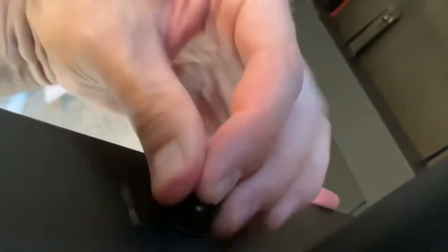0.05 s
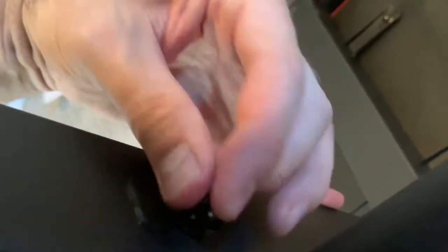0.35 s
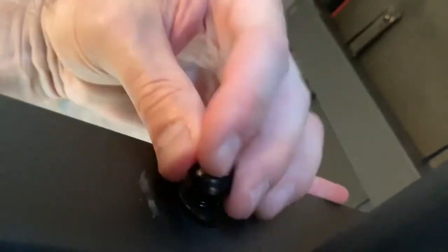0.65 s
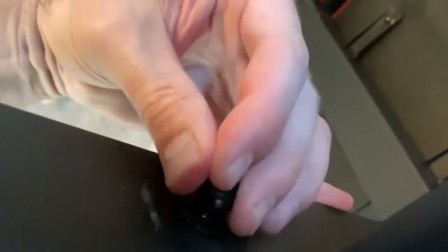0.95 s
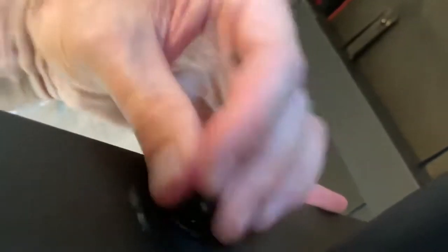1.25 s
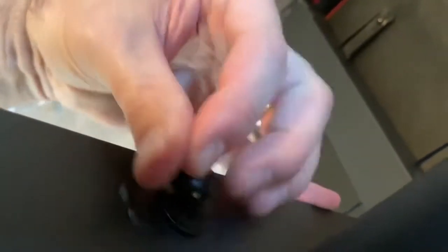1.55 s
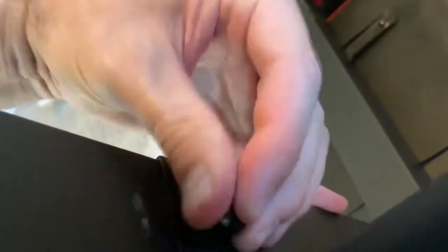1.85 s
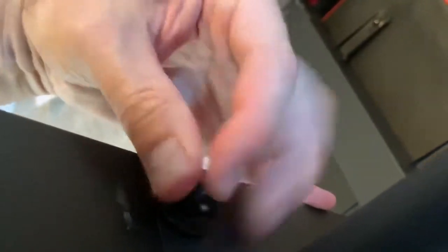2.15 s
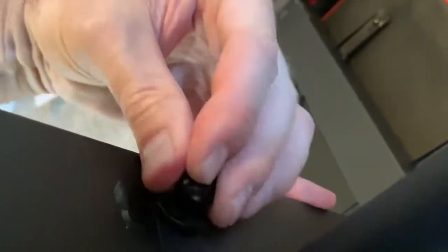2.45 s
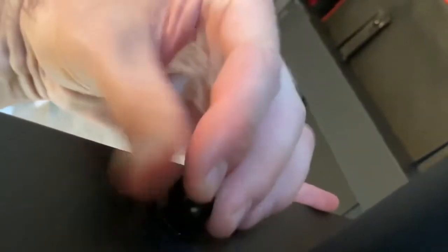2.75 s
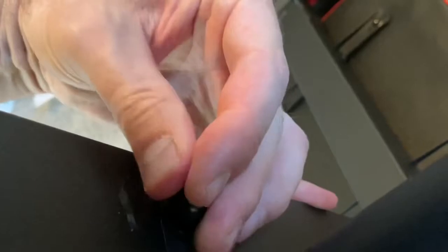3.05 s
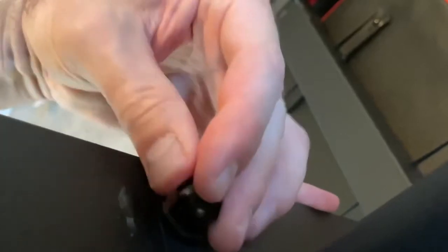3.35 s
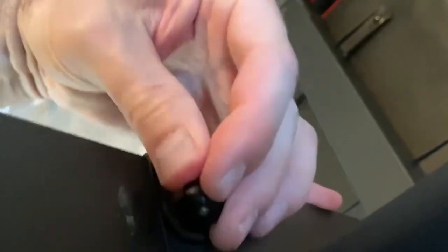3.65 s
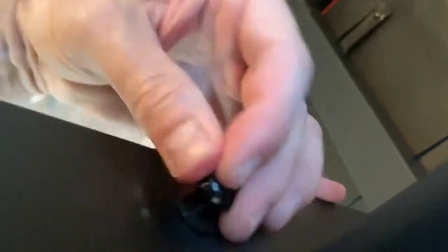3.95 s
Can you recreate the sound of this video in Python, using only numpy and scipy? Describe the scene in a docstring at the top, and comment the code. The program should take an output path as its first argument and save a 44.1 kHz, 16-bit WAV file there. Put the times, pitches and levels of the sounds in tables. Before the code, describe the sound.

A small knob clicks and snaps as fingers turn it, over a low hum.

```python
"""Over mains hum and low machine rumble in a quiet room, fingers turn a small knob on a metal frame,
heard close and wide. Clicks begin at 0.2 s, each a crunch of tiny impacts that rings the frame;
between them the loose knob scuffs and knocks. The catch snaps hard at 1.1 s, skin slides to a new grip
at 1.6 s, and a second hard snap at 1.8 s comes with a clack of the knob's body. Weaker clicks and two
more slides follow, and two faint knocks close the scene near 3.9 s."""
import sys
import numpy as np
from scipy import signal
from scipy.fft import rfft, irfft
from scipy.io import wavfile

SR = 44100
rng = np.random.default_rng(int(sys.argv[2]) if len(sys.argv) > 2 else 0)


def store_pcm(level_fs):
    """Save levels as 16-bit WAV."""
    pcm = np.round(np.clip(level_fs, -1, 1) * 32767).astype(np.int16)
    wavfile.write(sys.argv[1], SR, np.atleast_2d(pcm).T)


N = 176400
HZ, TIME = np.fft.rfftfreq(N, 1 / SR), np.arange(N) / SR

# Event levels are relative within each table.
# knob clicks: (peak time [s], low level [dB], middle level [dB], high level [dB], rise [s], fall [s])
CLICKS = [(.212, -39.5, -52, -57, 0.008, 0.014), (.228, -40.5, -40.5, -38.5, 0.00045, 0.0075),
          (.250, -45, -46, -54, 0.0052, 0.027), (.265, -44, -40.5, -41, 0.0017, .0085),
          (0.325, -44, -53, -55, 0.00072, 0.011), (1.085, -31, -29, -26.5, 0.0027, 0.0078),
          (1.253, -42, -33.5, -34, 0.0024, 0.0085), (1.762, -43, -57, -65, 0.0016, 0.007),
          (1.776, -38, -47, -60, .0027, 0.005), (1.791, -28.5, -25.5, -35, .0037, 0.0069),
          (1.797, -36, -27, -33, 0.0011, .004), (1.879, -36.5, -32, -35, 0.0016, 0.0045),
          (2.105, -48, -43.5, -48, 0.00053, 0.0063), (2.13, -28, -40, -44, 0.0031, 0.0045),
          (2.145, -41.5, -40.5, -53, 0.002, 0.01), (2.578, -34.5, -43, -36.5, 0.0028, 0.0047),
          (2.592, -37.5, -43.5, -43, 0.011, 0.015), (2.868, -41, -42.5, -49, .0008, 0.0022),
          (3.209, -31, -39, -42.5, 0.0043, 0.008), (3.442, -42, -50, -57, 0.004, 0.0036)]
# low, middle, high and top bands of a click: (frequency [Hz])
CLICK_BANDS_HZ = [1660, 5700, 9800, 15800]
# spectrum common to all clicks: (frequency [Hz], gain [dB])
CLICK_SPECTRUM = [(100, -43), (380, -11), (520, -5.5), (780, -7), (1100, 0), (1550, 3.5), (2300, 5),
                  (3400, 1), (5000, -3.5), (7000, 1.5), (8700, 4.5), (11000, -4.5), (13500, -9)]
# snaps of the catch: (time [s], level [dB], fall [s])
SNAPS = [(.2272, -25, .0012), (.640, -41.5, 0.0026), (.667, -39, 0.002), (1.0798, -14.5, 0.0056),
         (1.2518, -23, 0.00094), (1.424, -44, 0.0059), (1.7922, -30, 0.00084), (1.7963, -8, 0.00076),
         (1.815, -29, 0.0006), (1.878, -22, .0018)]
# spectrum of a snap: (frequency [Hz], gain [dB])
SNAP_SPECTRUM = [(400, -23), (2500, -7.5), (5200, -12), (7000, -3), (9800, -1.5), (12500, -19)]
# modes of the metal frame: (frequency [Hz], gain [dB], T60 before the cap [s])
FRAME_MODES = [(602, -6.5, 0.14), (2776, 7, 0.064), (2965, 10.5, 0.096), (3560, 8, 0.15), (3890, 9, 0.04),
               (4450, 10.5, 0.077), (5330, 8, 0.13), (5970, 7, 0.14), (6460, 5, 0.054), (6940, 7.5, 0.03),
               (7850, 7, 0.17), (10300, -6, 0.044), (11020, -1.5, 0.09)]
# clacks of the knob's body: (time [s], level [dB])
CLACKS = [(1.788, -27), (1.878, -45), (2.127, -33), (2.579, -36), (3.206, -53), (3.44, -41.5)]
# modes of the knob's body: (frequency [Hz], gain [dB], T60 [s])
KNOB_MODES = [(1990, 1.5, 0.068), (2457, 2.5, 0.058), (2773, 1, 0.027)]
# knocks of the loose knob: (peak time [s], level [dB], treble tilt [dB/octave])
KNOCKS = [(.081, -57, 2), (.394, -41, -2.5), (.485, -55.5, -3.5), (.863, -55.5, -2), (.907, -52.5, -4),
          (2.165, -49.5, 0.5), (2.223, -49.5, -1.5), (2.372, -56.5, 0), (3.355, -55, -8),
          (3.915, -52.5, -4.5), (3.943, -55, -5.5)]
# dull scuffs of the turning knob: (peak time [s], level [dB], treble tilt [dB/octave])
SCUFFS = [(.031, -48, -11.5), (.153, -54, -14.5), (.614, -52, -10.5), (1.062, -50, -6.5),
          (1.228, -50.5, -6), (2.712, -60, -7), (2.77, -57.5, -11.5), (3.19, -54, -7), (3.86, -64.5, -2)]
# spectrum of the knob touching its seat: (frequency [Hz], gain [dB])
SEAT_SPECTRUM = [(200, -15), (700, -5.5), (1400, 7.5), (2400, 9.5), (4200, 6.5), (8000, 4.5), (15000, -11)]
# skin sliding to a new grip: (peak time [s], level [dB], rise [s], fall [s])
SLIDES = [(1.582, -58, 0.026, 0.087), (2.65, -64, 0.062, 0.087), (3.55, -57, 0.028, 0.082)]
# spectrum of skin friction: (frequency [Hz], gain [dB])
SKIN_SPECTRUM = [(300, -46), (1200, -1.5), (2500, 6.5), (7000, -2), (11000, -8), (14500, -23)]
# soft ticks of the fingers: (time [s], level [dB], frequency [Hz])
TICKS = [(.176, -47.5, 784), (0.611, -46.5, 710), (.618, -45.5, 2000), (2.996, -54.5, 1400),
         (3.018, -51, 1370)]
# stereo phase shift of the knob's sound: (frequency [Hz], lead of left [rad])
KNOB_PHASES = [(780, 0.5), (1030, -3), (4200, -2.5), (5800, -3.5), (8000, 0.66), (9500, 0.5), (11300, 0.5),
               (14000, 6)]
# stereo phase shift of the frame's sound: (frequency [Hz], lead of left [rad])
FRAME_PHASES = [(615, -0.5), (2900, -2.5), (3900, -2.54), (4490, 2), (5400, -4), (7900, -1), (11000, 4)]
# reverberation time of the room: (frequency [Hz], T60 [s])
ROOM_T60 = [(300, 0.15), (2000, 0.32), (5000, 0.25), (9000, 0.3), (15000, 0.05)]
# spectrum of the reverberation: (frequency [Hz], gain [dB])
ROOM_SPECTRUM = [(300, 0), (2500, 0), (6000, -8.5), (11000, -21)]
# stereo width of diffuse sound: (frequency [Hz], side minus middle [dB])
DIFFUSE_WIDTH = [(200, -64), (600, -10.5), (1200, 9), (3500, 6), (6000, -4.5), (12000, -35)]
# hum of mains and machine: (frequency [Hz], rms level of the steady part [dB], waver depth [0-1])
HUM_LINES = [(29.7, -69, 0), (59.46, -42, 0.28), (108.7, -60, 0.33), (120.2, -53.5, 0.44), (239.5, -61, 0)]
# room rumble and hiss: (frequency [Hz], spectral density [dB re 1/Hz])
FLOOR_SPECTRUM = [(20, -82.5), (45, -66), (70, -75), (95, -72), (118, -76), (142, -81), (175, -77.5),
                  (220, -86), (320, -85), (500, -95), (900, -101), (2000, -106), (4000, -112.5),
                  (15500, -118)]
# stereo width of rumble and hiss: (frequency [Hz], side minus middle [dB])
FLOOR_WIDTH = [(120, -62), (350, -78), (700, -24), (1500, -8.5), (3500, -7.5), (6000, -17), (10000, -24)]

LN_1000 = np.log(1000)  # exponent of a 60 dB decay


def clicks(gain_db=5.5, top_follow=.89, grip_from_db=-39, grip_damping=.62):
    """Stick-slip: the knob catches and lets go. Returns the sound and the force on the frame."""
    sound, force = np.zeros((2, N))
    for time, low_db, middle_db, high_db, rise, fall in CLICKS:
        offset, hz, burst = crunch(rise, fall)
        top_db = high_db + top_follow * (high_db - middle_db)
        bands = list(zip(CLICK_BANDS_HZ, (low_db, middle_db, high_db, top_db)))
        click = colour(burst, curve(bands, hz) + curve(CLICK_SPECTRUM, hz) + gain_db)
        add(sound, time + offset, click)
        grip_loss_db = grip_damping * max(low_db - grip_from_db, 0)  # the grip damps strong clicks
        add(force, time + offset, click * amp(-grip_loss_db))
    return sound, force


def crunch(rise, fall, impacts_per_s=8700, friction=.86, size=8192):
    """Superposition of tiny impacts and friction. Returns start offset [s], bins [Hz] and the burst."""
    t = (np.arange(size) - size // 4) / SR
    hz = np.fft.rfftfreq(size, 1 / SR)
    chance = impacts_per_s / SR
    strength, hiss = rng.standard_normal((2, size))
    impacts = strength * (rng.random(size) < chance) / np.sqrt(chance)
    # each touch lands on another spot, with its own resonant peaks and dips
    ripple_hz = np.arange(0, SR / 2, 260)
    ripple_db = np.interp(hz, ripple_hz, 2.5 * rng.choice([-1, 1], len(ripple_hz)))
    envelope = swell(t, rise, fall)
    burst = colour(impacts + friction * hiss, ripple_db) * envelope
    return t[0], hz, burst * np.linalg.norm(envelope) / np.linalg.norm(burst)


def catch_snaps():
    """An abrupt impact has a broad spectrum: the catch drops home with a bright crack."""
    out = np.zeros(N)
    for time, db, fall in SNAPS:
        offset, hz, burst = crunch(rise=.0001, fall=fall)
        add(out, time + offset, colour(burst, db + curve(SNAP_SPECTRUM, hz)))
    return out


def frame_ring(force, t60_cap_s=.12, spot_db=1.5, spot_s=.12):
    """Modal resonance: force rings the frame, and the shifting point of contact favours other modes."""
    spot_times = np.arange(0, N / SR + spot_s, spot_s)
    out = np.zeros(N)
    for hz, db, t60 in FRAME_MODES:
        damping = LN_1000 / min(t60, t60_cap_s) / SR
        pole = np.exp(2j * np.pi * hz / SR - damping)
        coupling_db = np.interp(TIME, spot_times, spot_db * rng.choice([-1, 1], len(spot_times)))
        out += signal.lfilter([2 * damping], [1, -pole], force * amp(db + coupling_db)).real
    return out


def body_clacks(rise_s=.002):
    """Damped free vibration: a firm turn leaves the knob's body ringing briefly."""
    t, out = TIME[:SR // 5], np.zeros(N)
    ring = sum(amp(db) * np.exp(-LN_1000 * t / t60) * np.sin(2 * np.pi * hz * t)
               for hz, db, t60 in KNOB_MODES)
    onset = 1 - np.exp(-t / rise_s)
    for time, db in CLACKS:
        add(out, time, amp(db) * ring * onset)
    return out


def seat_contacts(events, rise, fall, pivot_hz=2400):
    """Contact noise of the knob in its seat: a slow onset is heard as a scuff, a fast one as a knock."""
    out = np.zeros(N)
    for time, db, tilt in events:
        offset, hz, burst = crunch(rise, fall)
        octaves_above = np.log2(np.maximum(hz / pivot_hz, 1))
        add(out, time + offset, colour(burst, db + curve(SEAT_SPECTRUM, hz) + tilt * octaves_above))
    return out


def skin_slides(gain_db=7.5):
    """Sliding friction: skin moving over the knob makes smooth swells of hiss."""
    envelope = sum(amp(db + gain_db) * swell(TIME - time, rise, fall) for time, db, rise, fall in SLIDES)
    hiss = colour(rng.standard_normal((2, N)), curve(SKIN_SPECTRUM))
    return widen(hiss, DIFFUSE_WIDTH) * envelope


def finger_ticks(width_s=.00088):
    """Gaussian wave packets: a few cycles are too short to carry a clear pitch and are heard as ticks."""
    out = np.zeros(N)
    for time, db, hz in TICKS:
        t = TIME - time
        out += amp(db) * np.exp(-(t / width_s) ** 2) * np.sin(2 * np.pi * hz * t)
    return out


def phase_spread(x, phases):
    """Stereo width: left and right are shifted out of phase, so the sound is heard wide."""
    half_shift = np.exp(.5j * curve(phases))
    return irfft(rfft(x) * np.array([half_shift, 1 / half_shift]), N)


def reflections(x, gain_db=-8, t60=.031):
    """Early reflections off the desk, different on the left and right."""
    t = TIME[:SR // 5]
    tail = rng.standard_normal((2, len(t))) * np.exp(-LN_1000 * t / t60) * (t > .001)
    tail = widen(tail / np.linalg.norm(tail[0]), DIFFUSE_WIDTH)
    return signal.fftconvolve(x[None], amp(gain_db) * tail, axes=1)[:, :N]


def room(x, gain_db=-12, delay_s=.005):
    """Reverberation: a diffuse tail decays exponentially in each band, the highest treble first."""
    noise = rng.standard_normal((2, SR // 2)) * (TIME[:SR // 2] > delay_s)
    hz, t, bands = signal.stft(noise, SR, nperseg=256)
    decay = np.exp(-LN_1000 * t / curve(ROOM_T60, hz)[:, None])
    tail = signal.istft(bands * decay, SR, nperseg=256)[1]
    tail = widen(tail / np.linalg.norm(tail[0]), DIFFUSE_WIDTH)
    source = colour(x, gain_db + curve(ROOM_SPECTRUM))
    return signal.fftconvolve(source[None], tail, axes=1)[:, :N]


def background():
    """A line spectrum of hum, partly wavering, over a continuous spectrum of machine rumble and hiss."""
    noise = colour(rng.standard_normal((2, N)), curve(FLOOR_SPECTRUM)) * np.sqrt(SR / 2)
    out = widen(noise, FLOOR_WIDTH)
    for hz, db, waver in HUM_LINES:
        real, imag = rng.standard_normal((2, 13))
        drift = np.interp(TIME, np.linspace(0, N / SR, len(real)), real + 1j * imag)
        tone = np.exp(2j * np.pi * (hz * TIME + rng.random()))
        out += np.sqrt(2) * amp(db) * ((1 + waver * drift) * tone).real
    return out


def amp(db):
    """Decibels to amplitude ratio."""
    return 10 ** (np.asarray(db) / 20)


def curve(points, hz=HZ):
    """Interpolation of (frequency [Hz], value) points on a log-frequency axis."""
    point_hz, values = np.transpose(points)
    return np.interp(np.log(hz + 1), np.log(point_hz + 1), values)


def colour(x, db):
    """Zero-phase filtering by a gain curve on the frequency bins of x."""
    return irfft(rfft(x) * amp(db), x.shape[-1])


def add(mix, time, sound):
    """Superposition: a sound joins the mix at the given time [s]."""
    start = round(time * SR)
    sound = sound[max(-start, 0):]
    part = mix[max(start, 0):][:len(sound)]
    part += sound[:len(part)]


def widen(pair, width):
    """Mid-side mixing: two unrelated signals become partly coherent left and right channels."""
    ratio = amp(curve(width, np.fft.rfftfreq(pair.shape[1], 1 / SR)))
    middle, side = rfft(pair) / np.sqrt(1 + ratio ** 2)
    return irfft(np.array([middle + ratio * side, middle - ratio * side]), pair.shape[1])


def swell(t, rise, fall):
    """Exponential growth up to t = 0 and decay after it, with time constants in seconds."""
    return np.exp(np.where(t < 0, t / rise, -t / fall))


def scene():
    """Source, resonator and room: the knob drives the frame, and both sound in the humming room."""
    crunches, click_force = clicks()
    snaps, clacks = catch_snaps(), body_clacks()
    scuffs = amp(6.5) * seat_contacts(SCUFFS, rise=.007, fall=.014)
    knocks = seat_contacts(KNOCKS, rise=.0021, fall=.012)
    # a knock shakes the frame harder than a scuff
    force = click_force + snaps + amp(-7) * scuffs + amp(7) * knocks
    ring = frame_ring(force)
    knob = crunches + snaps + clacks + scuffs + knocks
    near = phase_spread(knob, KNOB_PHASES) + phase_spread(ring, FRAME_PHASES) + reflections(knob + ring)
    return near + room(force + ring) + finger_ticks() + skin_slides() + background()


def record(dry, cutoff_hz=15850):
    """Band limiting: a steep low-pass filter removes the highest treble."""
    lowpass = signal.firwin(511, cutoff_hz, window=("kaiser", 9), fs=SR)
    return signal.oaconvolve(dry, lowpass[None], "same")


dry = scene()
out = record(dry)
store_pcm(out)
```